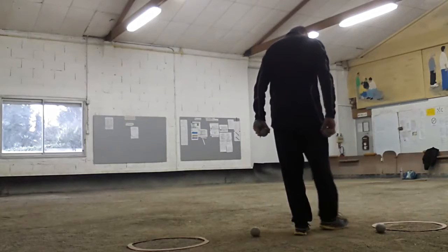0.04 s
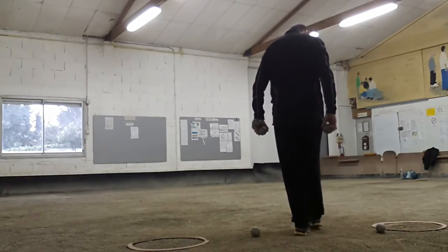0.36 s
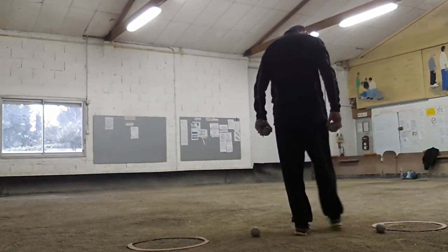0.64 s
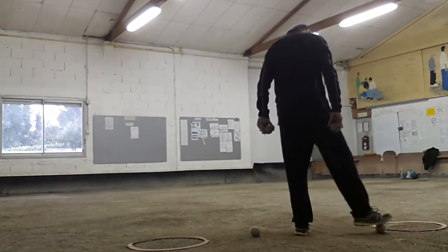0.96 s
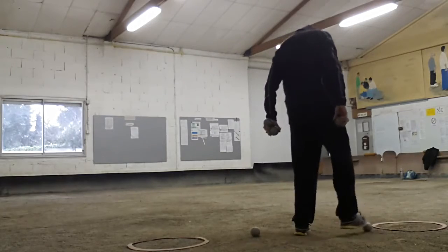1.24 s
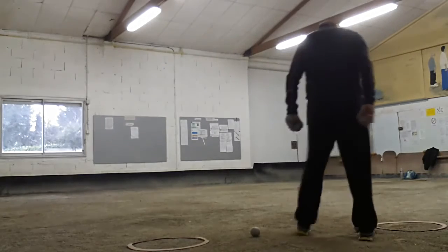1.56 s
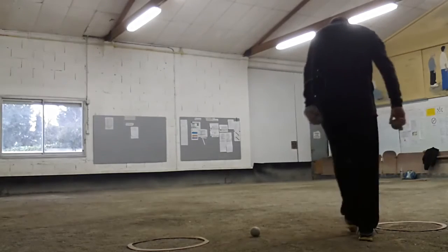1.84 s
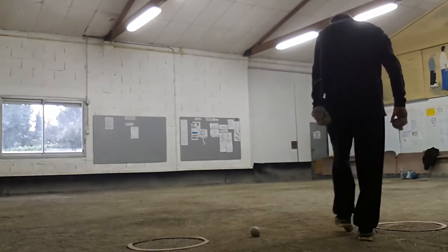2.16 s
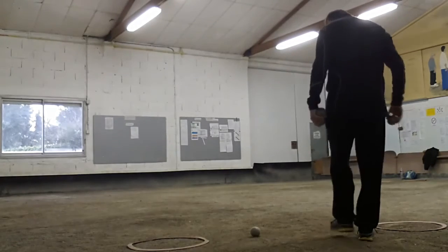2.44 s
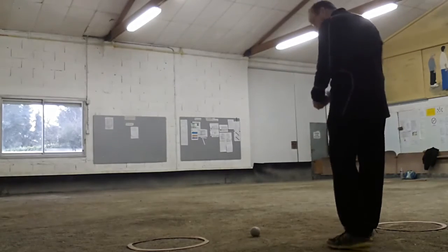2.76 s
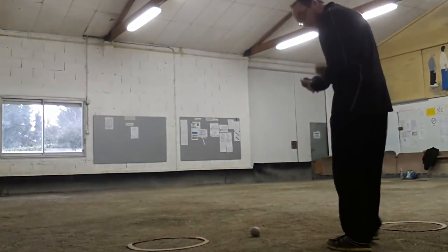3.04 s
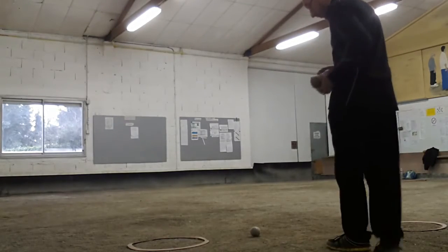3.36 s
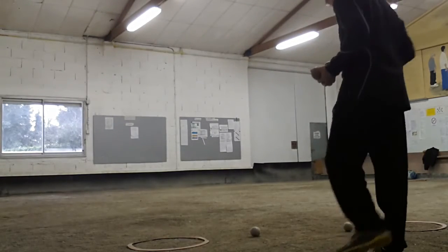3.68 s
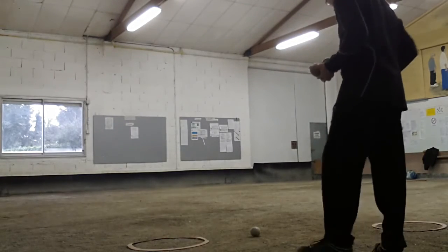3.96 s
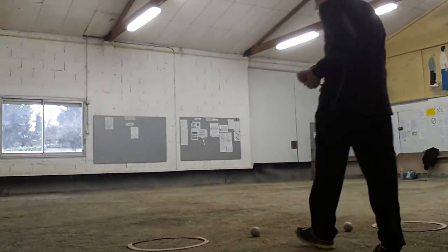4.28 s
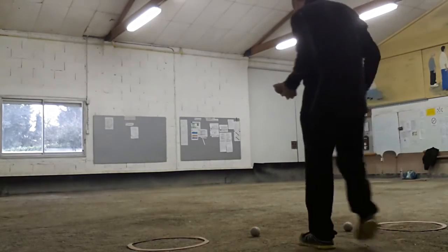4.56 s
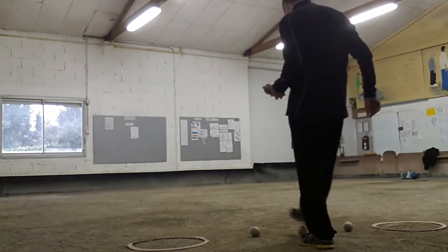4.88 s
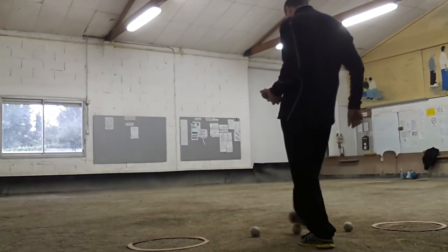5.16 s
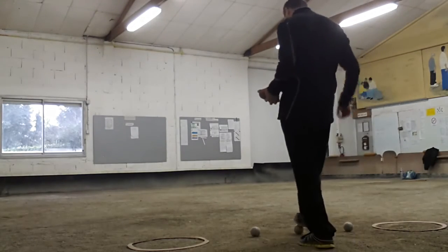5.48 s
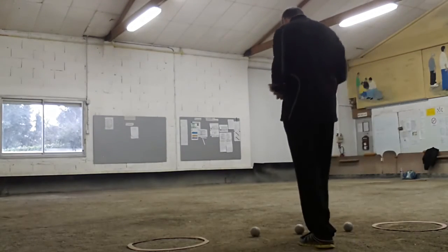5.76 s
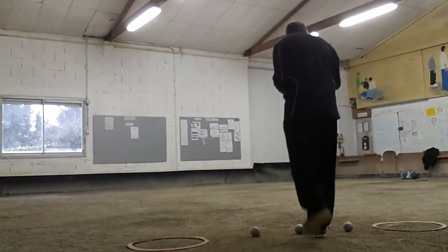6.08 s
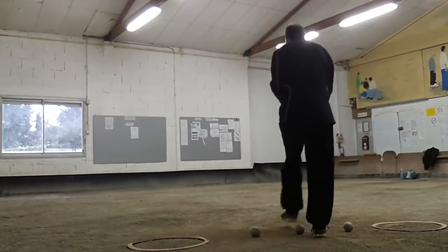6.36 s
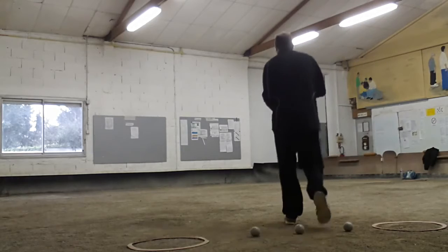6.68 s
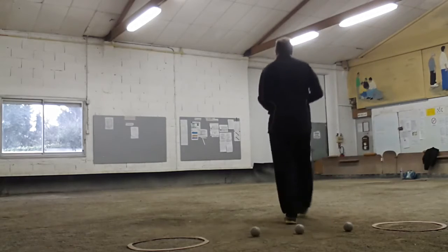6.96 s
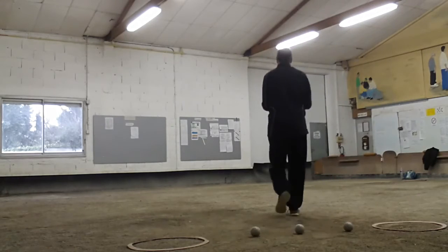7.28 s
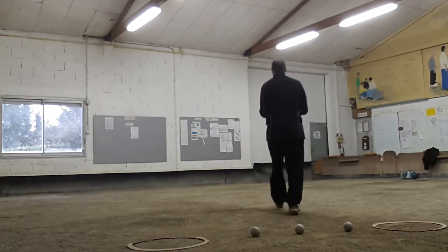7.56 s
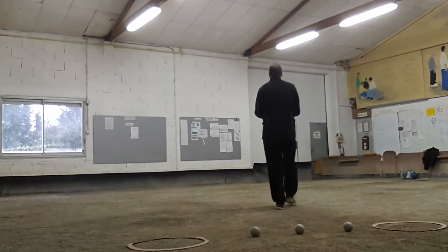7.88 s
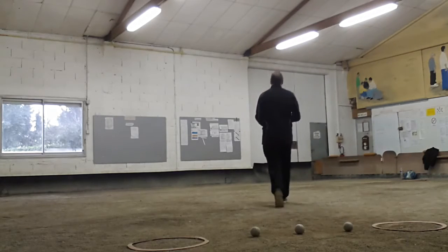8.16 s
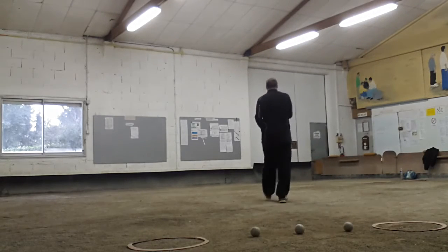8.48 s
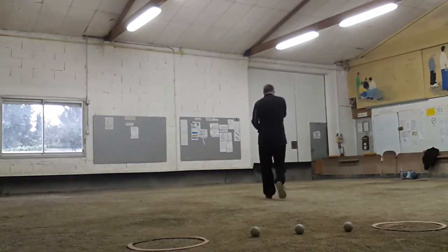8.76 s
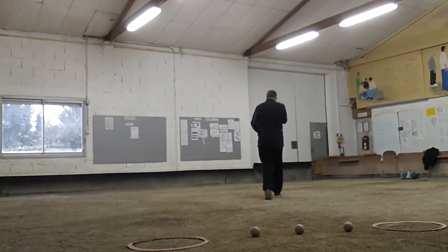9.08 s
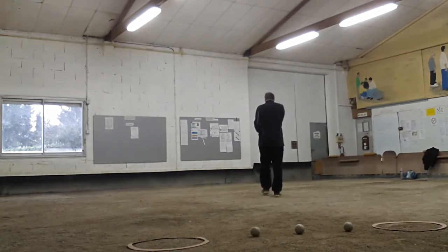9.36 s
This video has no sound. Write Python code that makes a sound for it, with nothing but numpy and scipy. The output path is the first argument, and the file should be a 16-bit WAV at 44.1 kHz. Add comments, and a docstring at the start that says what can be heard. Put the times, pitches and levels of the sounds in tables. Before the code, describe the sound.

Hard metal balls clack together in cupped hands a few metres from the microphone, each hollow crack answered by the echo of a big hall. A loud cluster comes first, followed by dull knocks and gritty scrapes as boules are nudged over gravel. More irregular clacks follow, some very loud, while quiet crunching steps recede over steady low room noise.

```python
"""Shoes scuff and knock on the gravel floor of a large hall, four metres from a stereo microphone.
A player comes in to about two metres, nudging steel boules along the ground, gathers them and walks off.
The balls clack together in his cupped hands: each sharp pulse rings the hollow between the palms,
and the loudest overload the microphone. The hall answers every crack, over a low murmur and thin hiss."""
import sys
import numpy as np
from scipy import signal
from scipy.fft import rfft, irfft
from scipy.io import wavfile
from scipy.ndimage import uniform_filter1d

SR = 44100
rng = np.random.default_rng(int(sys.argv[2]) if len(sys.argv) > 2 else 0)


def log_audio(samples):
    """Write samples as a 16-bit WAV file to the path given in sys.argv[1]."""
    # one column per channel
    frames = np.atleast_2d(samples).T
    # limit to full scale, then quantise
    limited = np.clip(frames, -1, 1)
    pcm = np.round(limited * 32767).astype(np.int16)
    wavfile.write(sys.argv[1], SR, pcm)


N = 415863
TAPS = 2048
BINS = np.fft.rfftfreq(TAPS, 1 / SR)
NEAR_M = 2.4  # levels and echo delays are given for a player this far from the microphone

# Packed earth under a sole. Each row: frequency in Hz, relative level in dB.
EARTH_SPECTRUM = [(40, -29), (110, -38.5), (200, -5), (400, -1), (680, 1.5), (950, -10), (1400, -9),
                  (3000, -46), (8000, -43)]
# Single stones of the gravel. Each row: frequency in Hz, relative level in dB.
GRIT_SPECTRUM = [(200, -18.5), (900, 1.5), (1500, 6.5), (2500, 2.5), (4300, -1.5), (6000, -13.5),
                 (8200, -17.5), (14000, -28)]
# Plain steps, each a heel knock inside a short crunch of the sole.
# Each row: start in seconds, strength in dB.
FOOTSTEPS = [(2.167, -22.5), (6.719, 0), (7.211, 0.5), (7.713, 1.5), (9.2, -4.5)]


def clacks(hard_db=13, hardening=0.23, hollow_gain_hz=2470, trapping=1.07, ripple_db=4.5, ring_share=0.61):
    """Steel hits steel: one sharp pressure pulse rings the hollow of the hands for a few milliseconds."""
    # Each row: start in seconds, strength in dB, direct sound past the body in dB,
    # pitch of the hollow in Hz, its width in Hz.
    collisions = [(2.8837, 23, -2, 2250, 700), (3.1225, 17.5, 1.5, 1830, 400),
                  (3.3156, 11, -1.5, 1640, 520), (3.337, 8, 1, 1700, 550), (3.355, 5, 2.5, 1660, 600),
                  (3.382, 4.5, -7, 1590, 900), (4.5530, -12.5, 2, 1920, 800), (4.562, -10, 1, 1880, 800),
                  (4.6058, -10.5, 4, 2200, 600), (6.0590, -2.5, -11.5, 1750, 250),
                  (6.4960, 12.5, -1, 1860, 116), (6.7956, 16.5, -0.5, 1780, 700),
                  (6.9090, 12.5, -5, 1660, 294), (7.449, -1.5, -4.5, 1630, 500), (7.499, -2, -4, 2190, 450),
                  (7.560, -3, -7, 1880, 200), (8.0230, 21, -6, 1855, 200.7), (8.3644, 22, 0, 1600, 830),
                  (8.5884, 11.5, 4, 1450, 280)]
    # The bare crack of steel on steel. Each row: frequency in Hz, relative level in dB.
    steel_spectrum = [(60, -34.5), (150, -27), (350, -12.5), (720, -2), (950, -7), (1300, 0.5), (2100, -2),
                      (3000, -2), (4200, -8), (5500, -22.5), (7000, -38.5), (10000, -92.5), (15000, -60)]
    # The player's body screens the microphone. Each row: frequency in Hz, relative gain in dB.
    body_screen = [(200, 0), (700, -3.5), (1000, -5), (1700, -0.5), (2600, 0), (3200, -6), (4100, -0.5),
                   (6000, -14.5), (14000, -22)]
    out = np.zeros((2, N))
    octaves = np.log2(np.maximum(BINS, 500) / 2000)
    for s, strength_db, past_body_db, hollow_hz, width_hz in collisions:
        # harder blows touch more briefly, so the crack is brighter
        crack = read(steel_spectrum, BINS) + hardening * (strength_db - hard_db) * octaves
        # tighter hands ring longer and stand out more
        hollow = 10 * np.log10(1 + hollow_gain_hz ** 2 / (width_hz ** 2 + (2 * (BINS - hollow_hz)) ** 2))
        # the hollow holds sound near its own pitch back, so the ring swells over two or three cycles
        detune = trapping * ((BINS + 1) / hollow_hz - hollow_hz / (BINS + 1))
        held_back = np.exp(-2j * np.arctan(detune))
        # arms and body scatter the direct sound differently to each microphone
        scatter = uniform_filter1d(rng.standard_normal((2, len(BINS))), size=16, axis=1)
        scatter *= ripple_db / scatter.std()
        direct = np.array([pulse(crack + hollow + read(body_screen, BINS) + side) for side in scatter])
        direct_db = strength_db + past_body_db + nearness_db(s)
        add(out, s, irfft(rfft(direct) * held_back) * amp(direct_db) * pan(left_db=0.9))
        # the crack escaping between the fingers feeds the hall
        escaping = irfft(rfft(pulse(crack + ring_share * hollow)) * held_back)
        add(out, s, amp(strength_db) * through(hall(distance(s)), escaping))
    return out


def knocks(room, hall_db=-3, thump_cycles=5.9, earth_db=-5, crush_s=0.0044, stone_db=9, stone_octaves=0.25):
    """A blow on packed earth: a damped thump and a burst of grit, pitched by the size of the stones."""
    # Shoes and balls striking the ground. Each row: start in seconds, level in dB, thump pitch in Hz,
    # grit against the thump in dB, pitch of the crushed stones in Hz.
    blows = [(.078, -3, 664, -1, 1390), (.131, -6.5, 600, 8, 1280), (1.183, -12, 513, -12, 1200),
             (1.994, -5.5, 563, -18, 1217), (2.009, -12, 470, -13, 1200), (3.408, -5.5, 534, -2.5, 1600),
             (3.966, -13.5, 150, -22, 1500), (4.037, 0.5, 266, -31, 1900), (4.076, -7, 357, 0.5, 1900),
             (4.178, -5.5, 513, -4.5, 2160), (4.242, 8, 622, -13.5, 1380), (4.283, -15.5, 720, 9, 2480),
             (4.873, -4, 497, -19, 1400), (4.93, -1.5, 200, -10, 4450), (5.115, -6.5, 557, -13, 5000),
             (5.335, -12, 232, -8.5, 4240)]
    heel_db, heel_hz, heel_grit_db, heel_stone_hz = -7, 495, 0.5, 1750
    heels = [(s, heel_db + db, heel_hz, heel_grit_db, heel_stone_hz) for s, db in FOOTSTEPS]
    dry = np.zeros((1, N))
    t = np.arange(TAPS * 2) / SR
    earth = pulse(read(EARTH_SPECTRUM, BINS))
    for s, db, hz, grit_db, stone_hz in blows + heels:
        t60 = thump_cycles / hz
        onset = 1 - np.exp(-(t * hz) ** 2)  # the ground yields, so the thump takes about a cycle to grow
        thump = unit(np.sin(2 * np.pi * hz * t) * amp(-60 * t / t60) * onset)
        stone_peak = np.exp(-(np.log2((BINS + 1) / stone_hz) / stone_octaves) ** 2)
        grit = pulse(read(GRIT_SPECTRUM, BINS) + stone_db * stone_peak)
        burst = rng.standard_normal((2, len(t))) * np.exp(-t / crush_s)
        soil = unit(signal.fftconvolve(burst[0], earth)[:len(t)])
        stones = unit(signal.fftconvolve(burst[1], grit)[:len(t)])
        knock = unit(thump + amp(earth_db) * soil) + amp(grit_db) * stones
        add(dry, s, amp(db) * knock[None])
    direct = dry * amp(nearness_db(np.arange(N) / SR))
    return direct * pan(left_db=-2.5) + amp(hall_db) * through(room, dry[0])[:, :N]


def scuffs(room, hall_db=-0.43, stones_per_s=1100, stone_spread_db=5, rub_spread_db=2,
           thud_hz=270, dull_hz=5000):
    """A sole drags stones along: dense slips of uneven size sound the earth below and the grit on top."""
    # Each row: start in seconds, length in seconds, earthy rub in dB, crunch of grit in dB,
    # low boost of the rub from the weight on the sole in dB.
    drags = [(-.12, .25, -32, -33, -6.5), (0.47, 0.2, -49, -55.5, -8), (1.487, .23, -47, -47.5, -1.5),
             (3.96, 0.044, -36.5, -41, 5), (4.004, 0.039, -31.5, -32.5, 8), (4.059, 0.18, -46.5, -46.5, -4),
             (4.245, 0.15, -46.5, -41, 6), (4.42, .19, -51.5, -47.5, 11), (4.876, .11, -35.5, -41.5, 3.5),
             (5.003, .16, -47.5, -48, 3), (5.939, 0.097, -44, -50, -14.5)]
    lead_s, sole_s, sole_rub_db, sole_crunch_db, sole_weight_db = 0.012, 0.06, -42.5, -32, -0.5
    soles = [(s - lead_s, sole_s, sole_rub_db + db, sole_crunch_db + db, sole_weight_db)
             for s, db in FOOTSTEPS]
    out = np.zeros((2, N))
    thud = np.exp(-np.log2((BINS + 1) / thud_hz) ** 2)
    treble = 1 - 1 / (1 + (BINS / dull_hz) ** 4)
    for s, length, rub_db, crunch_db, weight_db in drags + soles:
        n = int(length * SR)
        earth = pulse(read(EARTH_SPECTRUM, BINS) + weight_db * thud)
        grit = pulse(read(GRIT_SPECTRUM, BINS) + nearness_db(s) * treble)  # far steps are duller
        slips = impulses((3, n), stones_per_s) * signal.windows.tukey(n, 0.25)
        size = np.minimum(rng.exponential(1, (3, n)), 4)
        earth_slips = slips[0] * amp(rub_spread_db * size[0])
        stone_slips = slips[1:] * amp(stone_spread_db * size[1:])
        rub = amp(rub_db) * unit(signal.fftconvolve(earth_slips, earth))
        crunch = amp(crunch_db) * np.array([unit(signal.fftconvolve(side, grit)) for side in stone_slips])
        dry = np.sqrt(n) * (rub + crunch)
        add(out, s, dry * amp(nearness_db(s)) * pan(left_db=-0.5))
        add(out, s, amp(hall_db) * through(room, dry[0]))
    return out


def distance(s):
    """Metres from player to microphone at time s: he steps up to gather the balls, then walks off."""
    # Each row: time in seconds, distance in metres.
    walk = [(0, 4), (2.88, 2.3), (3.12, 1.97), (4.3, 2.04), (6.5, 2.2), (6.8, 3.05), (8.36, 4.58),
            (9.4, 6.4)]
    return np.interp(s, *np.transpose(walk))


def nearness_db(s):
    """Direct sound falls by 6 dB for each doubling of distance."""
    return 20 * np.log10(NEAR_M / distance(s))


def hall(metres, far_wall_m=12.4, length_s=1.5, taps_per_s=7000, lumpy_db=2, tail_db=-1,
         spread_s=0.00017, flutter_per_s=70, flutter_db=-15):
    """The hall's answer from one spot: distinct echoes, then a tail that swells, flutters and dies."""
    # Reflections off floor, roof and walls. Each row: delay in seconds at NEAR_M, level in dB.
    echoes = [(0.0126, -15), (0.0152, -17.5), (0.038, -29), (.0474, -15), (0.0583, -14.5), (0.078, -18.5),
              (.095, -21)]
    # Diffuse sound returning from the far walls. Each row: delay in seconds at NEAR_M, relative dB.
    build_up = [(.003, -20.5), (.02, -5), (.043, -9.5), (.056, -2), (.075, 2.5), (.11, 1.5), (.17, 1.5),
                (.3, 2)]
    # Each row: frequency in Hz, seconds for the tail to fall by 60 dB.
    decay_times = [(100, 0.46), (500, 1.204), (1500, 1.325), (2800, 1.23), (4300, 1.17), (7000, 0.75),
                   (14000, 0.12)]
    n = int(length_s * SR)
    t = np.arange(n) / SR
    # the nearer the player is to the far wall, the sooner the sound returns
    stretch = (far_wall_m - metres) / (far_wall_m - NEAR_M)
    swell = amp(np.interp(t / stretch, *np.transpose(build_up)))
    taps = impulses((2, n), taps_per_s) * amp(lumpy_db * rng.standard_normal((2, n))) * swell
    mid_decay = amp(-60 * t / read(decay_times, hz=2000))
    taps *= amp(tail_db) * np.sqrt(2) / np.linalg.norm(taps * mid_decay)
    # mirror-like bounces off the bare walls reach both microphones almost together
    bounces = np.flatnonzero(rng.random(n) < flutter_per_s / SR)
    size = amp(flutter_db) * rng.uniform(-0.86, 1, len(bounces)) * swell[bounces]
    for side in taps:
        jitter = (2 * spread_s * SR * rng.standard_normal(len(bounces))).astype(int)
        side[np.clip(bounces + jitter, 0, n - 1)] += size
    tail = diffuse_field(taps, lambda hz, s: -60 * s / read(decay_times, hz), size=256)
    for delay, db in echoes:
        arrival = np.abs(delay * stretch + spread_s * rng.standard_normal(2))
        tail[[0, 1], (arrival * SR).astype(int)] += amp(db)
    return tail * pan(left_db=-0.75)


def room_tone(level_db=-49, drift_db=1.2):
    """The low murmur of the empty hall under a thin, even hiss."""
    # Each row: frequency in Hz, relative level in dB.
    quiet_spectrum = [(25, -24), (60, -16), (130, -2.5), (200, -1), (450, 2.5), (700, -3), (1000, -7.5),
                      (1700, -8), (4000, -15), (6000, -20.5), (8200, -19), (11000, -18.5), (14500, -20)]

    def shape(hz, t):
        """The steady spectrum, its low end drifting slightly in patches."""
        patches = uniform_filter1d(rng.standard_normal((len(hz), len(t))), size=6, axis=0)
        patches = uniform_filter1d(patches, size=8, axis=1)
        return read(quiet_spectrum, hz) + drift_db * patches / patches.std() / (1 + hz / 2000)
    murmur = diffuse_field(rng.standard_normal((2, N)), shape, size=1024)
    return amp(level_db) * murmur / murmur.std() * pan(left_db=-1.8)


def diffuse_field(noises, shape, size):
    """Colours two noises by shape(Hz, s) in dB; long waves reach both microphones much alike."""
    # Each row: frequency in Hz, correlation of left and right.
    likeness = [(50, 0.64), (150, 0.64), (350, 0.96), (700, 0.7), (1300, 0), (2600, 0.14), (5000, 0),
                (14000, 0.0032)]
    hz, t, spectra = signal.stft(noises, SR, nperseg=size)
    same = read(likeness, hz)[:, None]
    spectra[1] = same * spectra[0] + np.sqrt(1 - same ** 2) * spectra[1]
    return signal.istft(spectra * amp(shape(hz[:, None], t)), SR, nperseg=size)[1][:, :noises.shape[1]]


def pulse(db):
    """The shortest causal pulse with this spectrum, of energy 1."""
    log_gain = np.log(amp(np.maximum(db, -100)))
    mirrored = np.concatenate([log_gain, log_gain[-2:0:-1]])
    minimum_phase = np.exp(np.conj(signal.hilbert(mirrored)))
    return unit(irfft(minimum_phase[:len(db)]))


def impulses(shape, per_s):
    """Randomly timed clicks of either sign."""
    return rng.choice([-1., 1.], shape) * (rng.random(shape) < per_s / SR)


def amp(db):
    """Decibels to gain."""
    return 10 ** (np.asarray(db) / 20)


def pan(left_db):
    """Stereo gains with the left side left_db above the right."""
    return amp([[left_db / 2], [-left_db / 2]])


def unit(x):
    """Scales to energy 1."""
    return x / np.sqrt(np.sum(x ** 2) + 1e-20)


def read(points, hz):
    """Reads a table on a log-frequency axis."""
    f, value = np.transpose(points)
    return np.interp(np.log(hz + 1), np.log(f + 1), value)


def add(mix, s, sound):
    """Mixes a sound in at s seconds."""
    start = round(s * SR)
    sound = sound[:, max(-start, 0):]
    part = mix[:, max(start, 0):][:, :sound.shape[1]]
    part += sound[:, :part.shape[1]]


def through(room, x):
    """A mono sound heard through a stereo response."""
    return signal.fftconvolve(x[None], room, axes=1)


def scene(low_cut_hz=115):
    """Boules, feet and the hall around them, as they reach the microphone."""
    ground = knocks(hall(NEAR_M)) + scuffs(hall(NEAR_M))
    # the microphone takes up little deep bass from the ground
    ground = signal.sosfilt(signal.butter(2, low_cut_hz, "high", fs=SR, output="sos"), ground)
    left, right = clacks() + ground
    # the player is a little to the right, so the left microphone hears him two samples later
    left = np.concatenate([np.zeros(2), left[:-2]])
    return room_tone() + np.array([left, right])


def record(dry, edge_hz=14800):
    """The loudest cracks overload the microphone and clip; then the top of the treble is cut."""
    clipped = np.clip(dry, -1, 1)
    low_pass = signal.firwin(255, edge_hz, window=("kaiser", 8), fs=SR)
    return signal.oaconvolve(clipped, low_pass[None], "same")


dry = scene()
out = record(dry)
log_audio(out)
```